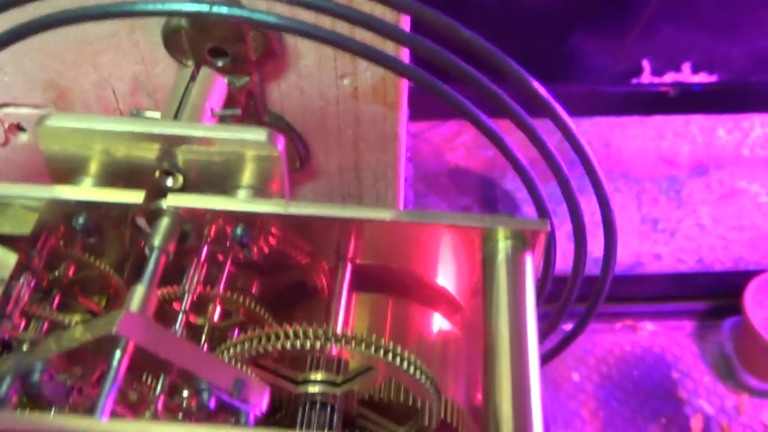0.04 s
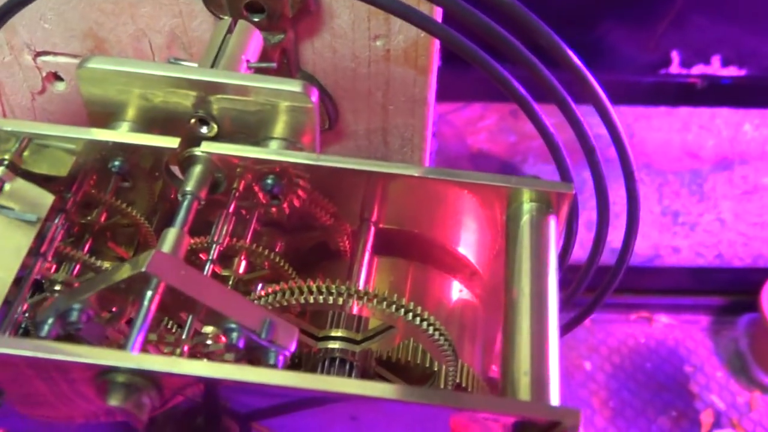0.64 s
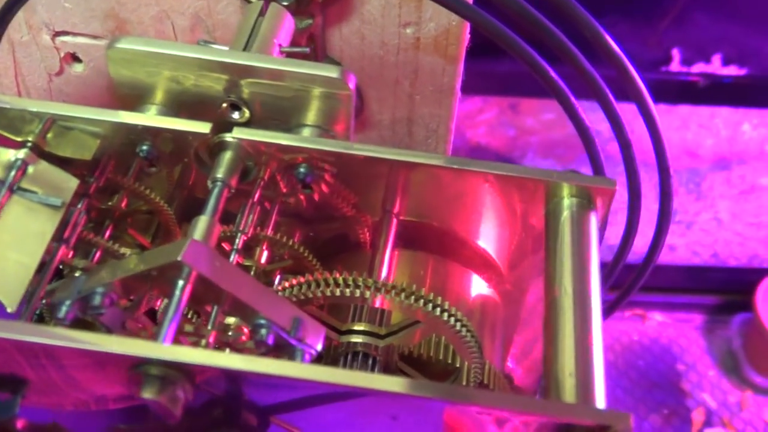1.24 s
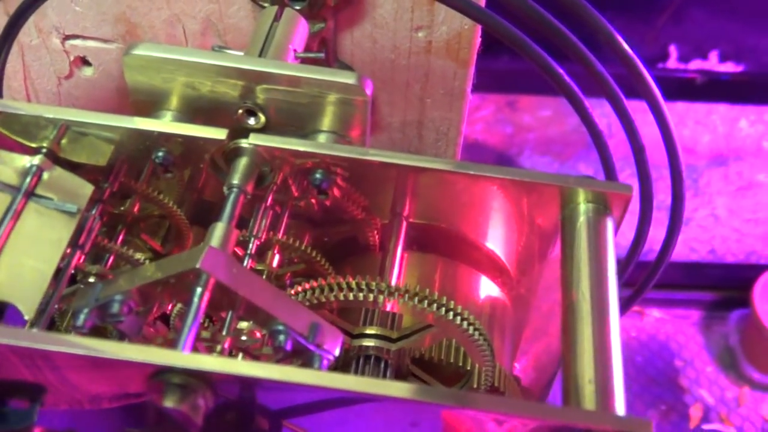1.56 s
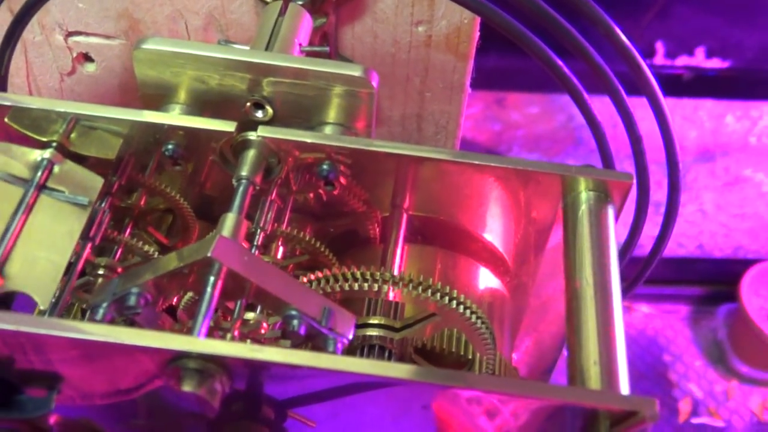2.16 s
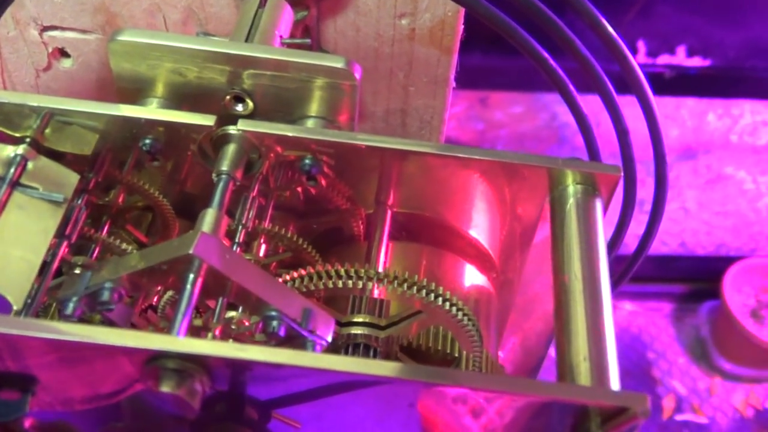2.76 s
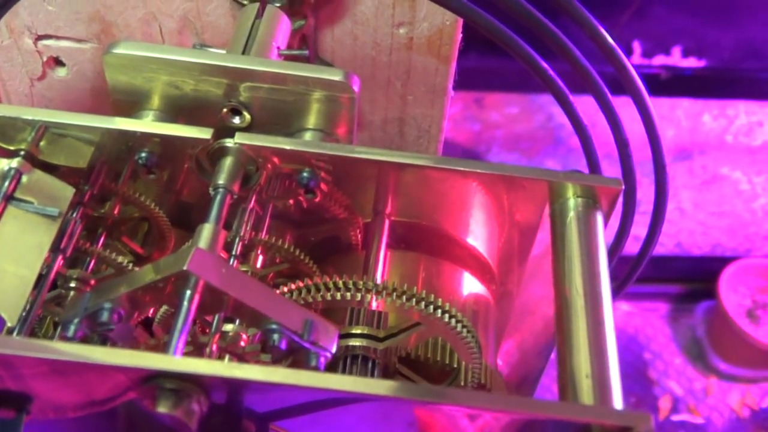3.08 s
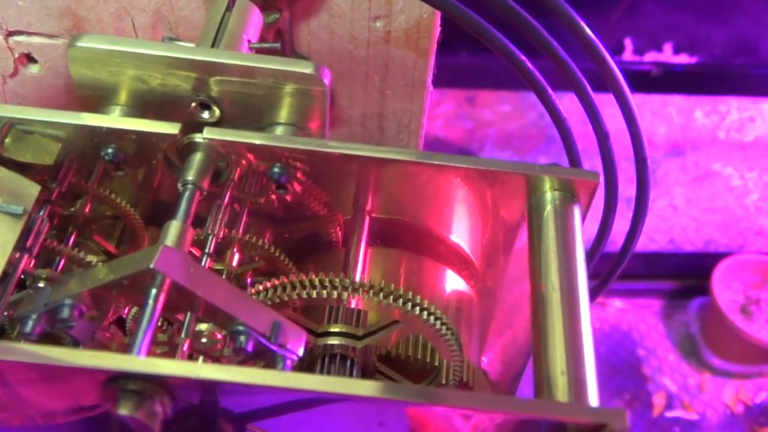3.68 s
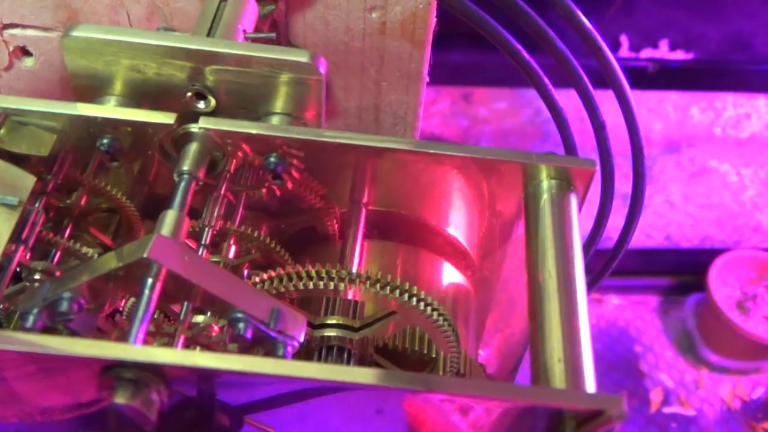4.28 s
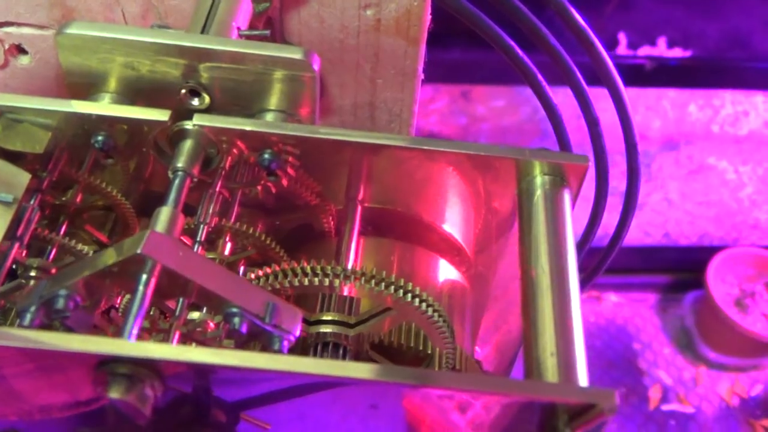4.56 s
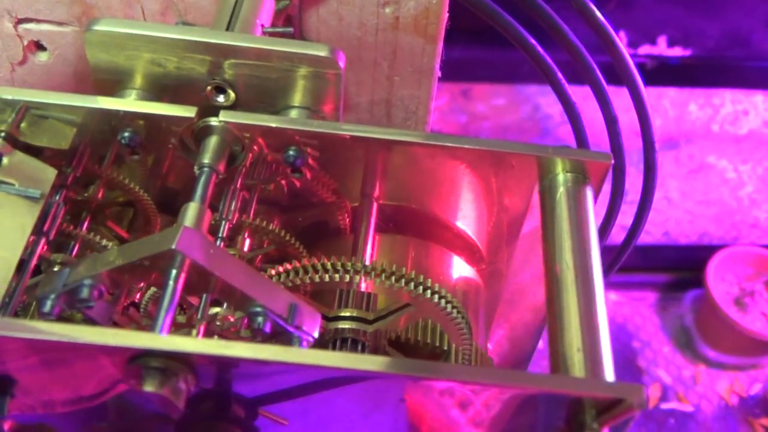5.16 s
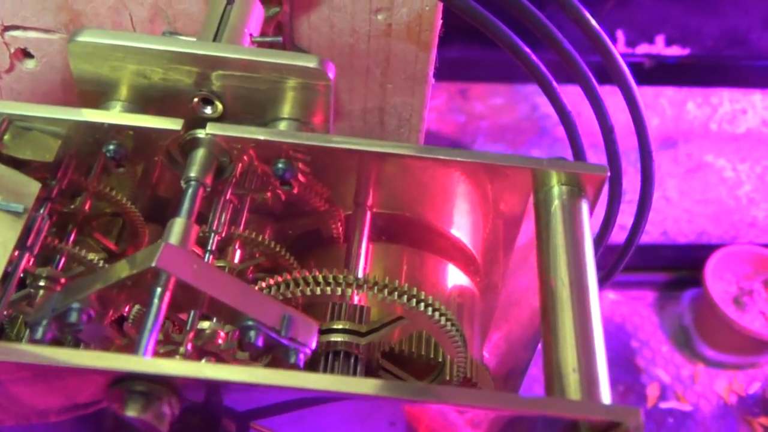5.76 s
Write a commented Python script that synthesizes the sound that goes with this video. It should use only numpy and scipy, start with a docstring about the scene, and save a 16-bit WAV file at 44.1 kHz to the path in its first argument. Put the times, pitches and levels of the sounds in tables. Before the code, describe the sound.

Several mechanical clocks tick at different speeds in a small workshop, one near and metallic, above a steady electrical hum and soft fan noise.

```python
"""A brass wall-clock movement ticks close by, slightly out of beat, in a small workshop: each blow of
a tooth on a pallet excites the modes of wheel and plates. Mains hum and a fan lie underneath.
Two quicker clocks, one wooden and one bright, and a soft once-a-second mechanism answer from across
the room, blurred by reflections from its walls. The hand-held microphone is bumped softly twice
near the start, and the last close tick jolts a thin spring into ringing."""
import sys
import numpy as np
from scipy import signal
from scipy.fft import rfft, irfft, next_fast_len
from scipy.io import wavfile
from scipy.ndimage import uniform_filter1d

SR = 44100
rng = np.random.default_rng(int(sys.argv[2]) if len(sys.argv) > 2 else 0)


def file_out(sig):
    """Save sig as 16-bit WAV at sys.argv[1]."""
    # one column per channel
    cols = np.atleast_2d(sig).T
    # limit, then scale
    lim = np.clip(cols, -1, 1)
    pcm = np.round(lim * 32767).astype(np.int16)
    wavfile.write(sys.argv[1], SR, pcm)


N = 261072
RING = 16384  # samples in one blow and its decay
AGE = np.arange(RING) / SR  # seconds since the blow

# Beats of the near clock. Each row: start in seconds, level in dB, gain of the main plate modes in dB.
NEAR_BEATS = [(0.0, -41, 2), (0.5675, -40.5, 1.5), (1.2475, -38.5, 2.5), (1.8098, -41, -4),
              (2.4963, -41, 2.5), (3.0578, -45, -3), (3.7405, -43, -0.5), (4.3023, -43, 0),
              (4.9828, -41.5, -1), (5.5477, -42, 3.5)]
# Modes of its escape wheel and plates. Each row: frequency in Hz, t60 (time to fall 60 dB) in seconds,
# level in dB for the entry pallet, level in dB for the exit pallet.
BRASS_MODES = [(1702, 0.035, -9.5, -19), (1810, 0.034, -38, -22.5), (2086, 0.078, -14, -18),
               (2338, 0.045, -20, -11), (2893, 0.033, -11.5, -13.5), (3110, 0.11, -20, -16.5),
               (3200, 0.25, -16.5, -16.5), (3800, 0.025, -27, -12), (4190, 0.015, -14.5, -12),
               (4510, 0.013, -14.5, -21), (5400, 0.015, -38, -19.5), (6250, 0.037, -15, -19),
               (7440, 0.017, -5, -17), (7550, 0.021, -6, -5), (8460, 0.013, -17.5, -45),
               (11400, 0.02, -15, -23)]
# Spectra of its frame's ring and of the room's reply. Each row: frequency in Hz, relative density in dB.
FRAME_SPECTRUM = [(100, -45), (700, -14), (1400, -13), (3300, 9), (5500, 0), (8000, 6), (10000, -8),
                  (14000, -10)]
FRAME_ROOM_SPECTRUM = [(60, -40), (170, -26), (340, 13), (550, -7), (1500, 8.5), (3200, -0.5), (4800, -7),
                       (7600, -4.5), (13000, -24)]
# Stereo width of the diffuse field. Each row: frequency in Hz, side relative to mid in dB.
SIDE_GAIN = [(30, -5), (120, 2.5), (300, -13), (1000, -17.5), (2500, -26.5), (5000, -16.5), (8000, -8),
             (13000, -20)]
# Spectrum of the moving air. Each row: frequency in Hz, relative density in dB.
AIR_SPECTRUM = [(25, -14), (50, -7.5), (80, -7), (130, -2), (200, -2), (255, 2.5), (295, 0), (340, 8.5),
                (420, -1.5), (540, -2.5), (730, 4.5), (830, -2.5), (1020, 4.5), (1180, -1), (1350, -6),
                (2000, -7), (2500, -9.5), (3100, -9), (4000, -14), (7000, -15.5), (8500, -15.5),
                (13500, -18.5), (15000, -30)]
# The air's lean to the right. Each row: frequency in Hz, left minus right in dB.
AIR_BALANCE = [(40, 1), (110, -4.5), (200, -0.5), (370, 0), (690, -2), (1300, -3.5), (2400, -2), (4300, 0)]
# Mains and fan tones. Each row: frequency in Hz, level relative to the mains hum in dB,
# left minus right in dB, unsteadiness from 0 to 1.
HUM_TONES = [(120, 0, -3.8, .05), (165.4, -10.5, -2, .6), (240, -21, 0, .4), (480, -17.5, -2, .4),
             (660.6, -18, -2, .5), (734.6, -17, -2, .6), (1135, -8.5, -2.5, .35), (1229.6, -14.5, -2, .4),
             (1797, -16.5, -1, .4)]
# Limping beats of the wooden clock, tick and tock in turn. Each row: start in seconds, level in dB.
WOODEN_BEATS = [(0.076, -50.5), (0.537, -53.5), (0.982, -52.5), (1.446, -51.5), (1.893, -52),
                (2.354, -49.5), (2.798, -50.5), (3.268, -49), (3.700, -51), (4.172, -52.5), (4.603, -51),
                (5.076, -52), (5.512, -48)]
# What its tick, then its tock, excites. Each row: case boom, panel ring and rattle in dB re the beat.
WOODEN_RESPONSES = [(-1.5, -2.5, -4), (-3.5, 0.5, -10.5)]
# Spectra of its knock and of its rattle. Each row: frequency in Hz, relative density in dB.
KNOCK_SPECTRUM = [(60, -40), (200, -11), (700, -7), (1100, -1.5), (1650, 2), (2600, -8), (3350, 0),
                  (4000, -16.5), (4450, -10.5), (5700, -24), (13000, -30)]
RATTLE_SPECTRUM = [(3000, 4), (6000, -3), (7000, 11.5), (7600, -8), (8500, 11.5), (9600, -25), (10500, 5),
                   (11600, -8), (12400, 6), (14000, -7)]
# Modes of its movement. Each row: frequency in Hz, t60 in seconds, level in dB.
WOODEN_MOVEMENT_MODES = [(562, 0.13, -18), (1566, 0.18, -11), (1715, .14, -12.5), (1820, 0.14, -17),
                         (3190, .13, -14.5), (3330, .13, -12.5), (3550, .11, -16), (3720, .11, -17),
                         (4490, 0.11, -20.5), (5060, .1, -22)]
# Bumps on the microphone's body. Each row: time in seconds, level in dB.
MICROPHONE_BUMPS = [(0.17, -56.5), (0.84, -57)]
# The bright clock's strong tick, then its weak tock. Each row: level in dB, tilt in dB per octave.
BRIGHT_BLOWS = [(-46, -1.77), (-50, -2.2)]
# Spectrum of its sound paths. Each row: frequency in Hz, relative density in dB.
BRIGHT_SPECTRUM = [(60, -40), (250, -23), (900, -4.5), (1600, 1), (2500, -4.5), (3500, 2), (4300, -7),
                   (5600, -6.5), (6400, 0.5), (7600, -5), (8500, 1), (10800, -2.5), (12300, 2),
                   (14000, -7.5)]
# Modes of its movement. Each row: frequency in Hz, t60 in seconds, level in dB.
BRIGHT_MOVEMENT_MODES = [(320, 0.084, -23), (1903, 0.075, -11.5), (3280, 0.055, -13.5), (3487, 0.059, -8),
                         (3702, 0.034, -6.5), (4840, 0.095, -18), (6360, 0.042, -15), (8177, 0.062, -15.5),
                         (8640, 0.05, -32), (12020, .02, -16), (11950, .02, -15)]
# Spectrum of the stepping mechanism's scuff. Each row: frequency in Hz, relative density in dB.
SCUFF_SPECTRUM = [(60, -40), (400, 1), (1500, 0.5), (3600, 2.5), (6400, -1), (7600, -6), (9300, -8.5),
                  (14000, -17)]
# Jolts to the spring. Each row: start in seconds, frequency in Hz, t60 in seconds, level in dB.
SPRING_JOLTS = [(5.548, 5976, .32, -54.5)]


def undb(db):
    """The decibel scale: every 20 dB multiplies amplitude by ten."""
    return 10 ** (np.asarray(db) / 20)


def colour(x, points):
    """Linear filtering: the spectrum is multiplied by a gain curve through (Hz, dB) points."""
    hz, db = np.transpose(points)
    size = next_fast_len(x.shape[-1] + RING // 4)
    bin_hz = np.maximum(np.fft.rfftfreq(size, 1 / SR), 1)
    gain = undb(np.interp(np.log(bin_hz), np.log(hz), db))
    return irfft(rfft(x, size) * gain, size)[..., :x.shape[-1]]


def tilt(x, db_per_octave):
    """Spectral tilt: a constant slope from 1 to 16 kHz, pivoting at 4 kHz."""
    return colour(x, [(1000, -2 * db_per_octave), (16000, 2 * db_per_octave)])


def diffuse(size):
    """A diffuse field: noise from all directions is only partly alike in the two channels."""
    mid, side = rng.standard_normal((2, size))
    return mid + colour(side, SIDE_GAIN) * np.array([[1], [-1]])


def strength(x, db):
    """Equal energy: a blow is scaled to match 30 ms of steady sound at this level."""
    energy = np.mean(np.sum(x ** 2, axis=-1))
    return x * undb(db) / np.sqrt(energy / (.03 * SR))


def swell(rise_s, t60):
    """Exponential damping: an envelope that builds up, then loses 60 dB every t60 seconds."""
    return (1 - np.exp(-(AGE / rise_s) ** 2)) * np.exp(-np.log(1000) * AGE / t60)


def wash(spectrum, rise_s, t60):
    """Statistical reverberation: dense modes and reflections merge into decaying noise."""
    return strength(colour(diffuse(RING) * swell(rise_s, t60), spectrum), 0)


def ring(push, hz, t60, db):
    """Resonance: one damped mode, driven by a force, acts as a two-pole band-pass."""
    radius = np.exp(-np.log(1000) / (t60 * SR))
    poles = [1, -2 * radius * np.cos(2 * np.pi * hz / SR), radius ** 2]
    return strength(signal.lfilter([1, 0, -1], poles, np.atleast_2d(push)), db)


def struck(response, bounce):
    """Convolution: a blow and a few ms of uneven bounces each set off the same impulse response."""
    bounces = rng.standard_normal(RING) * swell(rise_s=0.0014, t60=0.031)
    push = signal.unit_impulse(RING) + bounce * bounces / np.linalg.norm(bounces)
    return strength(signal.fftconvolve(response, push[None], axes=-1)[:, :RING], 0)


def wander(rate_hz):
    """Slow random modulation: smoothed steps with a spread near 1."""
    hold = int(SR / rate_hz)
    steps = np.repeat(rng.standard_normal(N // hold + 1), hold)
    return np.sqrt(2) * uniform_filter1d(uniform_filter1d(steps, hold), hold)[:N]


def add(out, start_s, sound):
    """Superposition: a sound adds to the mix from its start time on."""
    start = max(int(start_s * SR), 0)
    out[:, start:start + RING] += sound[:, :max(N - start, 0)]


def near_clock(entry_db_per_octave=-0.3, exit_db_per_octave=0.6):
    """Impact excitation: a tooth chatters on each pallet in turn; the brass rings, the room follows."""
    out = np.zeros((2, N))
    for beat, (start_s, db, plate_db) in enumerate(NEAR_BEATS):
        pallet = 1 - beat % 2  # 0 is entry, 1 is exit
        chatter = rng.standard_normal(RING)
        # every mode builds up over about as many cycles, so the low ones speak later
        brass = sum(ring(chatter * swell(rise_s=8 / hz, t60=60 / hz), hz, t60, pallet_db[pallet])
                    for hz, t60, *pallet_db in BRASS_MODES)
        frame = undb(-5.5) * wash(FRAME_SPECTRUM, rise_s=0.00085, t60=0.032)
        room = undb(-9) * wash(FRAME_ROOM_SPECTRUM, rise_s=0.0015, t60=0.18)
        # small plates radiate little bass; a harder jolt brings out their main modes
        radiation = [(100, -13), (1100, 0), (3100, 0), (3600, plate_db), (4600, plate_db), (5600, -1)]
        tick = colour(brass + frame + room, radiation)
        slope = exit_db_per_octave if pallet else entry_db_per_octave
        add(out, start_s, undb(db) * tilt(tick, slope))
    return out


def moving_air(level_db=-53.5):
    """Broadband flow noise: moving air gives a nearly steady rush, a little to the right."""
    field = colour(diffuse(N), AIR_SPECTRUM)
    air = np.array([colour(channel, [(hz, sign * db / 2) for hz, db in AIR_BALANCE])
                    for channel, sign in zip(field, (1, -1))])
    return air / air.std() * undb(level_db + 0.13 * wander(rate_hz=5.96))


def mains_and_fan(mains_db=-58):
    """Amplitude and phase modulation: the fan's tones waver, while the mains hum barely does."""
    out = np.zeros((2, N))
    t = np.arange(N) / SR
    for hz, db, pan_db, unsteadiness in HUM_TONES:
        phase = 2 * np.pi * hz * t + rng.uniform(0, 2 * np.pi)
        in_phase = (1 + unsteadiness * wander(rate_hz=9)) * np.sin(phase)
        quadrature = unsteadiness * wander(rate_hz=9) * np.cos(phase)
        tone = in_phase + quadrature
        balance_db = np.array([[pan_db], [-pan_db]]) / 2
        out += tone / tone.std() * undb(mains_db + db + balance_db)
    return out


def wooden_clock():
    """Cavity and panel resonance: each knock sounds the case, and the loose linkage rattles after it."""
    out = np.zeros((2, N))
    paths = wash(KNOCK_SPECTRUM, rise_s=0.0027, t60=0.18)
    paths += wash(KNOCK_SPECTRUM, rise_s=0.0008, t60=0.096)
    for beat, (start_s, db) in enumerate(WOODEN_BEATS):
        boom_db, panel_db, rattle_db = WOODEN_RESPONSES[beat % 2]
        boom = ring(diffuse(RING) * swell(rise_s=0.03, t60=0.15), hz=361, t60=0.22, db=boom_db)
        panel = ring(diffuse(RING) * swell(rise_s=0.0034, t60=0.082), hz=1071, t60=0.42, db=panel_db)
        push = diffuse(RING) * swell(rise_s=0.00069, t60=0.054)
        modes = sum(ring(push, *mode) for mode in WOODEN_MOVEMENT_MODES)
        knock = undb(-1) * struck(paths, bounce=0.57) + modes
        rattle = wash(RATTLE_SPECTRUM, rise_s=.002, t60=0.38)
        add(out, start_s, undb(db) * (boom + panel + knock))
        add(out, start_s + .014, undb(db + rattle_db) * rattle)
    return out


def microphone_bumps(thud_hz=51):
    """Structure-borne sound: a cushioned blow on the microphone gives a deep thud, then a rumble."""
    out = np.zeros((2, N))
    for time_s, db in MICROPHONE_BUMPS:
        thud = np.sin(2 * np.pi * thud_hz * AGE) * swell(rise_s=.07, t60=0.18)
        rumble = wash([(25, -22), (48, -6), (80, -19), (300, -60)], rise_s=.03, t60=0.98)
        add(out, time_s - .005, strength(thud[None], db + 0.5))
        add(out, time_s + 0.046, undb(db - 2) * rumble)
    return out


def bright_clock(first_s=0.2652, period_s=0.5241):
    """Multipath propagation: a distant, even beat arrives mostly by the same wall reflections each time."""
    out = np.zeros((2, N))
    early = undb(-11) * wash(BRIGHT_SPECTRUM, rise_s=0.0006, t60=0.048)
    late = wash(BRIGHT_SPECTRUM, rise_s=0.011, t60=0.18)
    for beat, start_s in enumerate(np.arange(first_s, N / SR, period_s)):
        db, db_per_octave = BRIGHT_BLOWS[beat % 2]
        push = diffuse(RING) * swell(rise_s=0.004, t60=0.1)
        modes = sum(ring(push, *mode) for mode in BRIGHT_MOVEMENT_MODES)
        reflections = undb(0.5) * struck(early + late, bounce=0.96)
        add(out, start_s, undb(db) * tilt(modes + reflections, db_per_octave))
    return out


def stepper(first_s=0.883, period_s=0.997, advance_db=-53.5, drop_db=-54.5):
    """Transient noise: a drive advances, then drops back, making a soft double scuff each second."""
    out = np.zeros((2, N))
    for start_s in np.arange(first_s, N / SR, period_s):
        add(out, start_s, undb(advance_db) * wash(SCUFF_SPECTRUM, rise_s=0.012, t60=0.2))
        add(out, start_s + .036, undb(drop_db) * wash(SCUFF_SPECTRUM, rise_s=0.006, t60=0.2))
    return out


def spring():
    """Free vibration: after a jolt, a thin spring rings down at its natural frequency."""
    out = np.zeros((2, N))
    for start_s, hz, t60, db in SPRING_JOLTS:
        add(out, start_s, ring(signal.unit_impulse(RING), hz, t60, db))
    return out


def scene():
    """Superposition: the pressures of all the sources add."""
    return (near_clock() + moving_air() + mains_and_fan() + wooden_clock()
            + microphone_bumps() + bright_clock() + stepper() + spring())


def record(dry):
    """Band limiting: a steep elliptic low-pass removes the treble above 14.1 kHz."""
    return signal.sosfilt(signal.ellip(10, .2, 70, 14100, fs=SR, output="sos"), dry)


dry = scene()
out = record(dry)
file_out(out)
```